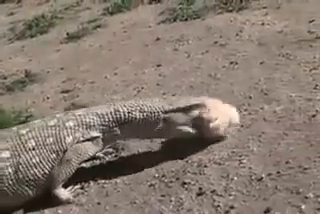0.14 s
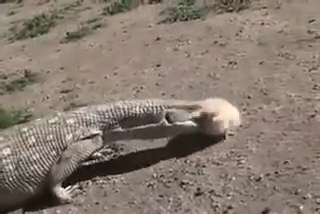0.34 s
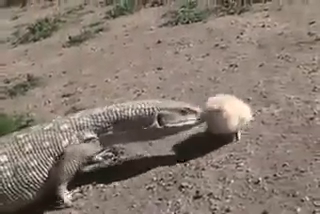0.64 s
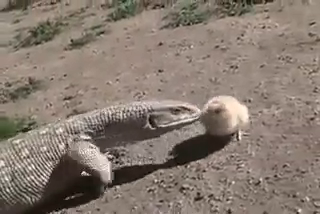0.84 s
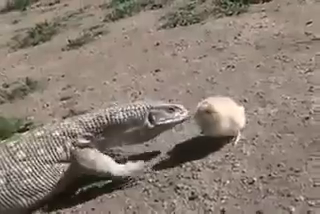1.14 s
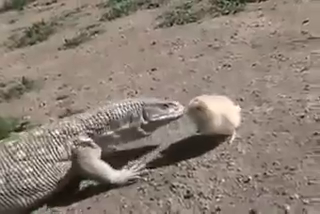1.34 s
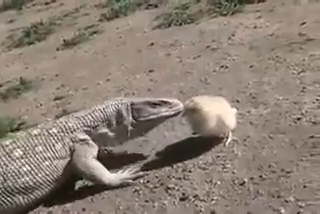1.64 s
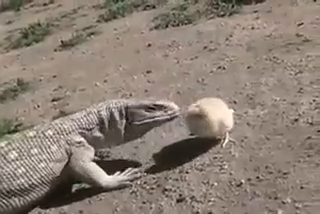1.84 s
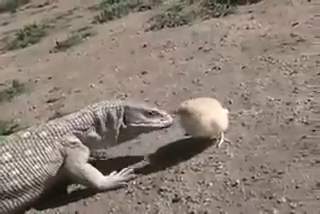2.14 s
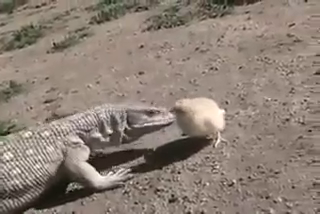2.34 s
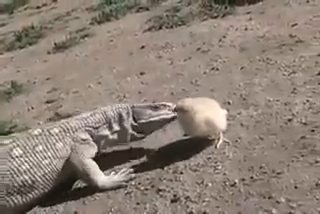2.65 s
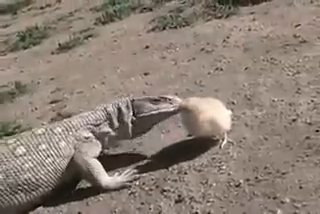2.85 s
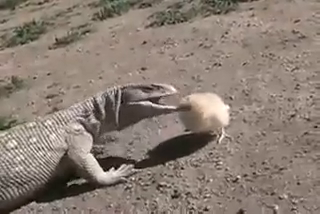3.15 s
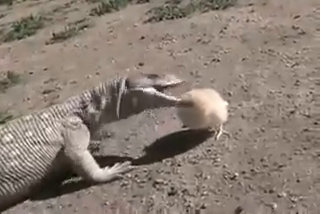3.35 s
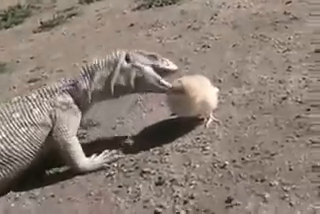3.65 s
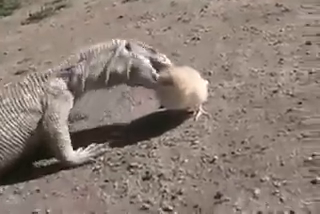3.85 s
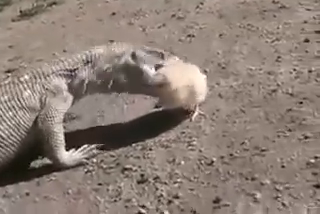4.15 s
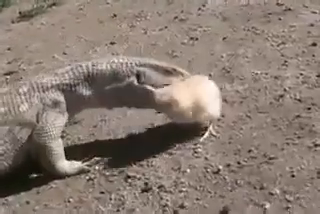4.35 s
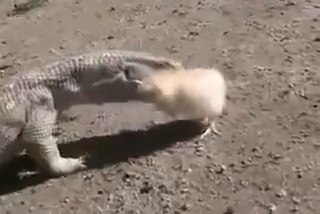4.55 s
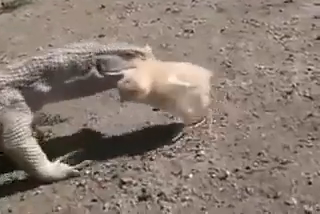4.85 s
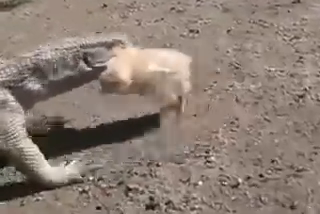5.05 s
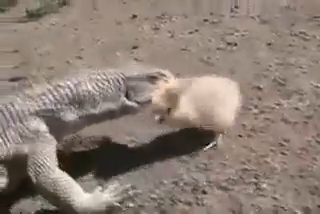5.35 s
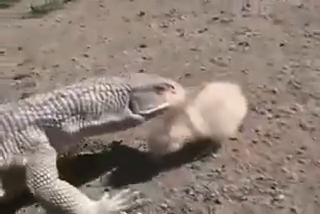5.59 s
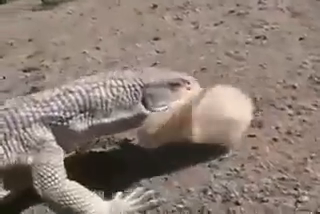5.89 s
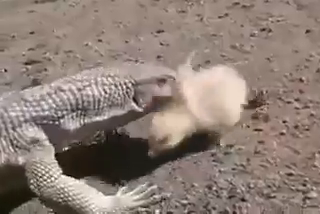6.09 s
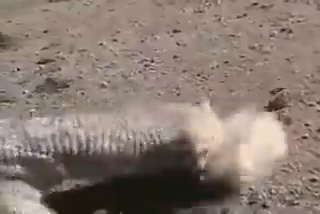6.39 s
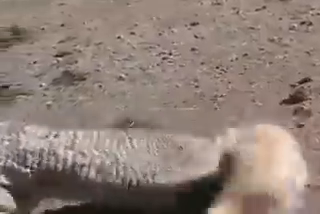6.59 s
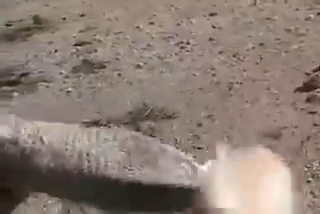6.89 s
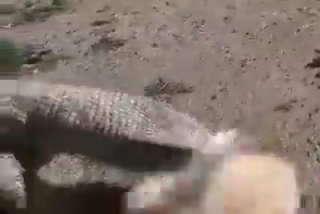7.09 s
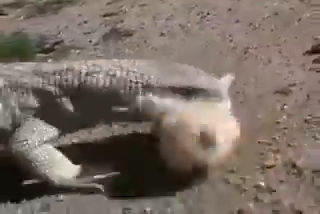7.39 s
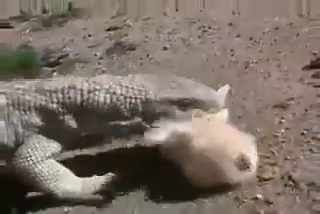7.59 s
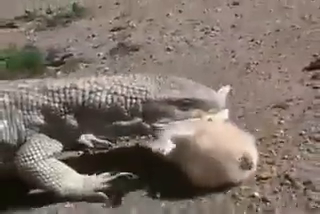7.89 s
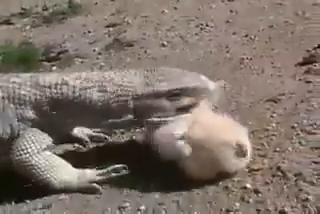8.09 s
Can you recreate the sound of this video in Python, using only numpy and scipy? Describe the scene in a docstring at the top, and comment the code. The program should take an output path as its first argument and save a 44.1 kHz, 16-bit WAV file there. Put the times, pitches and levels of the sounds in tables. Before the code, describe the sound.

A nearby chick cheeps softly now and then on open gravel, with small gritty crunches from a moving lizard. Wild birds chirp in the distance over a low outdoor rumble and faint motor hum. Then the chick suddenly cries out six times, loud and piercing, about two peeps a second, its voice breaking hoarsely. Brief soft wing flaps and a faint, low two-part bird call sound among the first cries.

```python
"""Low outdoor noise and a distant motor hum throughout; wild birds whistle and twitter far off.
A chick on open gravel gives seven soft cheeps while a monitor lizard shifts on the grit.
Seized at about 5.2 s, the chick gives six loud distress peeps, arched whistles of the syrinx.
From the second on, each cracks and drops into a rasping tail. After the first and the second,
wings flap against the ground; a low two-part call sounds far off."""
import sys
import numpy as np
from scipy import signal
from scipy.fft import rfft, irfft, next_fast_len
from scipy.io import wavfile
from scipy.ndimage import uniform_filter1d, map_coordinates

SR = 44100
rng = np.random.default_rng(int(sys.argv[2]) if len(sys.argv) > 2 else 0)


def pcm_store(signal):
    """Save signal as 16-bit PCM."""
    levels = np.round(np.clip(np.atleast_2d(signal), -1, 1) * 32767)
    wavfile.write(sys.argv[1], SR, levels.astype(np.int16).T)


N = 362943
TIME_S = np.arange(N) / SR

# outdoor noise spectrum (frequency [Hz], relative density [dB])
AIR_COLOUR = [(15, -55), (25, -22), (56, 1.5), (166, 0.5), (372, -8), (467, -10), (717, -12.5), (1020, -11),
              (1780, -20), (2290, -20), (2530, -22.5), (4300, -26.5), (4880, -26.5), (8290, -33.5),
              (10400, -39), (13500, -68.5), (22000, -120)]
# left-right likeness of that noise (frequency [Hz], correlation [0-1])
AIR_COHERENCE = [(40, .2), (100, 0.48), (400, 0.13), (1200, 0), (2500, 0.14), (5000, 0.01), (10000, 0)]
# its swell above the rumble (time [s], gain [dB])
AIR_SWELL = [(0, 2), (1.0, 0.5), (2.2, -0.5), (3.6, 1.5), (4.4, 2.5), (5.3, 4), (6.302, 0), (7.4, 2),
             (8.23, 2)]
# motor lines (frequency [Hz], level [dB], factor on the swell [ratio])
MOTOR_LINES = [(68, -58.5, .2), (136, -59, .5), (204, -63, 1.1), (990, -72, .7), (1163, -72, .7),
               (1346, -75, .7)]
# motor swell (time [s], gain [dB])
MOTOR_SWELL = [(0, -1.5), (1.15, 4), (1.3, 8.5), (1.55, 5.5), (1.75, 2.5), (3.7, 2), (5.2, 3), (6.6, -7),
               (7.5, 1.5), (8.23, 2)]
# dry gravel under the lizard (centre [s], half width [s], level [dB])
RUSTLES = [(.65, 0.75, -85), (2.15, 0.26, -68.5), (3.8, 0.24, -80)]
# rustle spectrum (frequency [Hz], gain [dB])
RUSTLE_COLOUR = [(1500, -27), (4000, -62), (6000, 19), (8000, 21), (10000, -26)]
# songbird phrase (delay [s], length [s], first [Hz], middle [Hz], last [Hz], level re phrase [dB])
PHRASE_NOTES = [(0, 0.061, 1765, 1865, 1980, 1), (0.11, 0.095, 2860, 3027, 2860, 0),
                (0.176, 0.13, 2620, 2450, 2280, 0.5)]
# its repeats (time [s], level [dB])
PHRASES = [(0.019, -59.5), (0.416, -57.5), (0.832, -60.5), (1.269, -62)]
# slightly sagging whistles (time [s], length [s], pitch [Hz], level [dB])
WHISTLES = [(.185, 0.12, 4910, -62), (.38, 0.22, 4870, -60), (2.603, 0.61, 4310, -65.5),
            (2.92, 0.076, 2870, -63.5), (3.17, .057, 3770, -58), (3.285, .053, 3670, -57),
            (3.478, .3, 4740, -68), (3.558, 0.066, 2890, -60), (3.869, 0.23, 4510, -57.5),
            (4.654, 0.051, 2950, -57.5)]
# runs of chips (time [s], run length [s], period [s], chip length [s], pitch [Hz], level [dB])
TRILLS = [(.668, .3, .12, 0.094, 5340, -64.5), (3.13, .22, 0.055, 0.0292, 4950, -57),
          (3.367, .1, .071, 0.044, 4710, -54)]
# chip pitch re run pitch (first [ratio], middle [ratio], last [ratio])
CHIP_FALL = (1.045, 1, 0.91)
# another bird's upslur (length [s], first [Hz], middle [Hz], last [Hz])
UPSLUR_NOTE = (.13, 2240, 2320, 2430)
# its repeats (time [s], level [dB])
UPSLURS = [(1.98, -68), (2.407, -62), (2.8, -60), (2.982, -58), (3.628, -58.5), (4.715, -58)]
# low two-part call (time [s], length [s], first [Hz], middle [Hz], last [Hz], level [dB])
HOOTS = [(5.87, .26, 817, 810.5, 896, -49.5), (6.17, .2, 816, 813, 820, -52.5)]
# soft cheeps (time [s], length [s], first [Hz], top [Hz], level [dB], octave re tone [dB])
CHEEPS = [(0.212, 0.065, 2060, 3440, -50.5, -20), (0.512, 0.089, 2390, 3850, -38, -35),
          (0.915, 0.055, 2940, 3620, -45, -19), (2.223, 0.048, 2990, 3580, -45, -16),
          (4.273, 0.061, 2370, 3810, -41.5, -8.5), (4.601, 0.071, 2250, 3786, -39, -12.5),
          (4.962, 0.043, 3150, 3750, -36.5, -20)]
# chick's throat response (frequency [Hz], gain [dB])
THROAT_COLOUR = [(900, -5), (1230, 5), (1480, -4.5), (2500, 2), (4000, 1), (5200, 2), (6500, 3.5),
                 (8000, -1), (9200, 5.5), (10400, -2.5)]
# ground and yard scatter (frequency [Hz], gain [dB])
SCATTER_COLOUR = [(1000, -17), (2500, -4), (4000, 2), (5200, 1), (7000, -7), (10000, -4)]
# flock bouts (centre [s], half width [s], level [dB])
TWITTER_BOUTS = [(.6, 0.39, -63), (3.55, 0.33, -58.5)]
# grit under claws and feet (time [s], level [dB])
CRUNCHES = [(2.468, -52), (4.135, -55), (4.494, -49.5), (5.083, -51), (5.381, -41)]
# crunch spectrum (frequency [Hz], gain [dB])
CRUNCH_COLOUR = [(150, -16), (500, 5), (1500, -7), (3500, -6), (6000, -13.5), (10000, -15)]
# lizard shifting its weight in the dirt (time [s], level [dB])
SHUFFLES = [(3.99, -48.5), (4.04, -47), (4.113, -51.5), (4.168, -50.5), (4.224, -50)]
# shuffle spectrum (frequency [Hz], gain [dB])
SHUFFLE_COLOUR = [(150, -28), (280, -4), (380, 4), (680, -1), (900, -13), (2000, -48), (10000, -51)]
# distress peeps (time [s], rise [s], fall [s], tail [s], first [Hz], top [Hz], before crack [Hz],
# after crack [Hz], rise bend [exponent], fall bend [exponent], top level [dB], swell to top [dB],
# fade from top [dB], brightness [dB], rasp [0-1])
PEEPS = [(5.241, .16, 0.28, 0.024, 3540, 5374, 3620, 3600, 3.08, 2.09, -10.5, 32, 29.5, -0.5, 0.05),
         (5.914, 0.11, .077, .1, 3650, 5239, 4430, 3487, 3.6, 3.5, -9, 16.5, 4, 9, 0.03),
         (6.423, 0.086, .104, 0.093, 3873, 5183, 4820, 3426, 2.3, 4.9, -9.5, 6.5, 2, 1, 0.04),
         (6.932, 0.12, 0.073, 0.092, 4560, 5396, 4650, 3504, 3.8, 2.4, -11, 4, 2, -5.5, 0.06),
         (7.465, .14, 0.053, 0.074, 4444, 5310, 4554, 3690, 3.2, 2, -17, 12, -8, -7, 0.1),
         (7.985, 0.13, 0.043, .108, 3825, 5080, 4590, 3385, 3.8, 2.4, -11.5, 11, -2.5, -7.5, 0.08)]
# octave strength by pitch (pitch [Hz], level re tone [dB])
OCTAVE_BY_PITCH = [(2300, -8.5), (2950, 1.5), (3400, -9), (4000, -22), (4700, -21), (5100, -15.5),
                   (5250, -30), (5400, -48.5)]
# spells of period doubling
# (time [s], length [s], 3/2 line [dB], 1/2 line re 3/2 line [dB], pitch sag [Hz], added rasp [0-1])
DOUBLINGS = [(5.288, 0.036, -31, -12, 4.5, 0), (5.461, .078, -27.5, -22.5, 259.5, 0.04),
             (5.932, .022, -34.5, -8, 4, 0), (6.15, 0.045, -22, -18.5, 2.5, 0.02),
             (6.437, .045, -40, -17.5, 1.5, .08), (6.546, .048, -31, -21, 130, 0.04),
             (6.633, .062, -19, -17, -1.5, 0.04), (6.956, .066, -18, -25.5, 59, .03),
             (7.17, 0.039, -22, -14.5, 3, 0.07), (7.483, 0.12, -25, -18, 72, 0.11),
             (7.667, 0.066, -25.5, -20, -3, .12), (8, 0.13, -40.5, -7, 1, 0),
             (8.196, 0.031, -20.5, -20.5, -1, 0.17)]
# second side of the syrinx, a little sharp
# (time [s], length [s], first beat [Hz], last beat [Hz], strength re main side [ratio])
SYRINX_BEATS = [(5.526, 0.054, 297.4, 527, 0.4), (6.089, 0.042, 330, 610, 0.92),
                (6.928, 0.033, 545, 243, 0.96), (7.03, 0.043, 187.8, 232, 0.61),
                (7.065, 0.048, 243.7, 150, .4), (7.589, 0.038, 267, 137.7, 0.79),
                (7.982, .038, 647, 260, 0.52)]
# fundamental dips, overtones carry on (centre [s], half width [s], depth [dB])
FUNDAMENTAL_DIPS = [(5.291, 0.0068, 12), (5.306, 0.046, 8), (5.55, 0.014, 5.5), (5.968, .009, 6),
                    (6.147, 0.02, 13), (6.535, .007, 16), (6.972, 0.014, 14), (7.065, .007, 12),
                    (7.56, 0.012, 5.5), (7.596, 0.0071, 7.5), (7.665, 0.0022, 13.5), (8.027, 0.025, 6.5),
                    (8.098, 0.01, 2), (8.15, .005, 5)]
# air tearing through the syrinx (frequency [Hz], gain [dB])
TURBULENCE_COLOUR = [(1200, -41.5), (2600, -11), (4000, 6), (7000, 6), (10000, -4.5)]
# wing flap bursts (time [s], length [s], period [s], level [dB])
FLAP_BURSTS = [(5.736, .34, .0403, -46.5), (6.213, .34, .052, -47.5)]
# flap spectrum (frequency [Hz], gain [dB])
FLAP_COLOUR = [(150, -20), (400, -8), (650, -2), (950, 0), (1300, -11), (3000, -23), (10000, -40)]


def gain_of(db):
    """dB to amplitude."""
    return 10 ** (np.asarray(db) / 20)


def unit_rms(x):
    """Scale to rms 1."""
    return x / np.sqrt(np.mean(x ** 2) + 1e-20)


def curve_at(points, hz):
    """Interpolate on a log-frequency axis."""
    points_hz, values = np.transpose(points)
    return np.interp(np.log(hz + 1), np.log(points_hz + 1), values)


def add(mix, start_s, sound):
    """Mix in place at start_s."""
    part = mix[max(round(start_s * SR), 0):][:len(sound)]
    part += sound[:len(part)]


def coloured(x, colour):
    """Filter by a spectrum in dB."""
    n = next_fast_len(x.shape[-1], True)
    response = gain_of(curve_at(colour, np.fft.rfftfreq(n, 1 / SR)))
    return irfft(rfft(x, n) * response, n)[..., :x.shape[-1]]


def wobble(size, cutoff_hz):
    """Low-passed noise, rms 1."""
    n = next_fast_len(size, True)
    rolloff = 1 + (np.fft.rfftfreq(n, 1 / SR) / cutoff_hz) ** 4
    return unit_rms(irfft(rfft(rng.standard_normal(n)) / rolloff, n)[:size])


def bumps(t, rows):
    return sum(height * np.exp(-((t - s) / width_s) ** 2) for s, width_s, height in rows)


def scatter(x, t60_s):
    """Dense reflections off ground and bushes, different per ear."""
    t = np.arange(SR // 2) / SR
    tail = rng.standard_normal((2, len(t))) * gain_of(-60 * t / t60_s) * (t > .002)
    return signal.fftconvolve(x[None], tail / np.linalg.norm(tail[0]), axes=1)[:, :N]


def air(level_db=-48.5, patch_db=1.08):
    """Low outdoor noise with drifting patches, partly alike in both ears."""
    frames, hz = N // 512 + 5, np.fft.rfftfreq(2048, 1 / SR)
    a, b, c, d, patches = rng.standard_normal((5, frames, len(hz)))
    patches = unit_rms(uniform_filter1d(uniform_filter1d(patches, size=9, axis=0), size=24, axis=1))
    coherence = curve_at(AIR_COHERENCE, hz)
    left = a + 1j * b
    right = coherence * left + np.sqrt(1 - coherence ** 2) * (c + 1j * d)
    swell_db = np.interp(np.arange(frames) * 512 / SR, *np.transpose(AIR_SWELL))[:, None]
    above_rumble = np.interp(hz, [150, 400], [0, 1])
    shape_db = curve_at(AIR_COLOUR, hz) + patch_db * patches + swell_db * above_rumble
    spectra = np.array([left, right]) * gain_of(shape_db)
    _, noise = signal.istft(spectra.transpose(0, 2, 1), nperseg=2048, noverlap=1536)
    return gain_of(level_db) * unit_rms(noise[:, :N])


def motor(waver_hz=2, flutter=.37):
    """Distant hum and faint whines, wavering in pitch and level."""
    out = np.zeros((2, N))
    swell_db = np.interp(TIME_S, *np.transpose(MOTOR_SWELL))
    for hz, db, share in MOTOR_LINES:
        phase = 2 * np.pi * np.cumsum(hz + waver_hz * wobble(N, 7.5)) / SR
        envelope = gain_of(db + share * swell_db) * (1 + flutter * wobble(N, 9))
        out += envelope * np.sqrt(2) * np.sin(phase + rng.normal(0, .72, (2, 1)))
    return out


def gravel_rustle(grain_db=4, clump_db=3):
    """Fine gravel shifting in clumps of tiny grains."""
    grains = rng.standard_normal(N) * gain_of(grain_db * wobble(N, 500) + clump_db * wobble(N, 12))
    push = bumps(TIME_S, [(s, width_s, gain_of(db)) for s, width_s, db in RUSTLES])
    return scatter(push * unit_rms(coloured(grains, RUSTLE_COLOUR)), t60_s=.04)


def bird_notes(sag=.012):
    """All far notes (time [s], length [s], first [Hz], middle [Hz], last [Hz], level [dB])."""
    notes = [(s + delay_s, *shape, db + note_db)
             for s, db in PHRASES for delay_s, *shape, note_db in PHRASE_NOTES]
    notes += [(s, *UPSLUR_NOTE, db) for s, db in UPSLURS]
    notes += [(s, length_s, hz * (1 + sag), hz, hz * (1 - sag), db) for s, length_s, hz, db in WHISTLES]
    for s, run_s, period_s, length_s, hz, db in TRILLS:
        chip_hz = hz * np.array(CHIP_FALL)
        notes += [(s + delay_s, length_s, *chip_hz, db) for delay_s in np.arange(0, run_s, period_s)]
    return notes + list(HOOTS)


def far_birds(direct_db=-3, wet_db=-3):
    """Gliding whistles, blurred by distance."""
    song = np.zeros(N)
    for s, length_s, first_hz, middle_hz, last_hz, db in bird_notes():
        u = np.linspace(0, 1, int(length_s * SR))
        waver = np.interp(middle_hz, [800, 2000, 3000, 4500], [.008, .02, .016, .007])
        glide_hz = np.polyval(np.polyfit([0, .5, 1], [first_hz, middle_hz, last_hz], 2), u)
        hz = glide_hz * (1 + waver * wobble(len(u), 180))
        envelope = gain_of(db + 2.5 * wobble(len(u), 40)) * signal.windows.tukey(len(u), .4)
        add(song, s, np.sqrt(2) * envelope * np.sin(2 * np.pi * np.cumsum(hz) / SR))
    return gain_of(direct_db) * song + gain_of(wet_db) * scatter(song, t60_s=.44)


def cheep(length_s, first_hz, top_hz, db, octave_db, crest=.68, drop=.17):
    """Soft note: slides up, swells at the top, sags."""
    u = np.linspace(0, 1, int(length_s * SR))
    rising_hz = first_hz + (top_hz - first_hz) * np.sin(np.pi / 2 * np.minimum(u / crest, 1)) ** 1.9
    falling_hz = top_hz * (1 - drop * ((u - crest) / (1 - crest)) ** 2)
    hz = np.where(u < crest, rising_hz, falling_hz) * (1 + .01 * wobble(len(u), 300))
    phase = 2 * np.pi * np.cumsum(hz) / SR
    envelope = np.interp(u, [0, .15, .45, .72, 1], [0, .33, .58, 1.3, 0])
    return gain_of(db) * envelope * (np.sin(phase) + gain_of(octave_db) * np.sin(2 * phase))


def direct_path(x, lag_ms=.032, right_db=1.0):
    """Two close microphone ports: right leads and is louder; both cues drift as the chick moves."""
    lag_samples = (lag_ms + .007 * wobble(N, 14)) * SR / 1000
    side_db = right_db + 1.2 * wobble(N, 25)
    left = map_coordinates(x, [np.arange(N) - lag_samples], order=5, mode="nearest")
    return np.array([left * gain_of(-side_db / 2), x * gain_of(side_db / 2)])


def chick(direct_db=-1.41, ground_db=-21, yard_db=-41):
    """Near voice through the throat, with short gravel scatter and a faint yard tail."""
    voice = np.zeros(N)
    for row in PEEPS:
        add(voice, row[0], peep(row))
    for s, *shape in CHEEPS:
        add(voice, s, cheep(*shape))
    voice = coloured(voice, THROAT_COLOUR)
    thrown = coloured(voice, SCATTER_COLOUR)
    return (gain_of(direct_db) * direct_path(voice)
            + gain_of(ground_db) * scatter(thrown, t60_s=.12)
            + gain_of(yard_db) * scatter(thrown, t60_s=.58))


def flock(count=1200, low_hz=2600, high_hz=5200, slide=.15, chirp_s=.013, floor_db=-83.5):
    """Tiny chirps, too distant to tell apart, swelling in bouts."""
    chirps, u = np.zeros(N), np.linspace(0, 1, int(chirp_s * SR))
    for when, height, slope in rng.random((count, 3)):
        hz = (low_hz + (high_hz - low_hz) * height) * (1 + slide * (2 * slope - 1) * u)
        add(chirps, when * N / SR, np.sin(np.pi * u) * np.sin(2 * np.pi * np.cumsum(hz) / SR))
    bouts = bumps(TIME_S, [(s, width_s, gain_of(db)) for s, width_s, db in TWITTER_BOUTS])
    return unit_rms(scatter(chirps, t60_s=.15)) * (gain_of(floor_db) + bouts)


def scuffs(rows, colour, decay_s, grain_db, wet_db):
    """Ground contacts: short puffs of grainy noise."""
    out, t = np.zeros(N), np.arange(SR // 12) / SR
    envelope = t / decay_s * np.exp(1 - t / decay_s)
    for s, db in rows:
        grains = rng.standard_normal(len(t)) * gain_of(grain_db * wobble(len(t), 600))
        add(out, s, gain_of(db) * unit_rms(coloured(grains, colour)) * envelope)
    return out + gain_of(wet_db) * scatter(out, t60_s=.04)


def peep_contour(start_s, rise_s, fall_s, tail_s, first_hz, top_hz, crack_hz, tail_hz,
                 rise_bend, fall_bend, top_db, swell_db, fade_db, bright_db, rasp):
    """Pitch arches under growing strain; given a tail over 40 ms, the voice cracks and slides down."""
    crack_s, surge_s, surge_db = .0078, .0038, 3
    tail_db, collapse_db, end_hz = -15.5, 40, 2220
    onset_rasp, strain_rasp, tail_rasp = .15, .13, .076
    octave_hold = .39  # share of swell and fade that the overtones resist
    cracks = tail_s > .04
    t = np.arange(0, rise_s + fall_s + cracks * tail_s, 1 / SR)
    after_s = t - rise_s - fall_s
    early, late = np.clip(1 - t / rise_s, 0, 1), np.clip((t - rise_s) / fall_s, 0, 1)
    tail = np.clip(after_s / max(tail_s, crack_s), 0, 1)
    cracked = cracks * (1 - np.exp(-(np.maximum(after_s, 0) / crack_s) ** 1.5))
    intact = 1 - cracked
    arch_hz = top_hz + (first_hz - top_hz) * early ** rise_bend + (crack_hz - top_hz) * late ** fall_bend
    hz = intact * arch_hz + cracked * (tail_hz + (end_hz - tail_hz) * tail)
    slack_db = swell_db * early ** 1.7 + fade_db * late ** 2.06
    level_db = intact * (top_db - slack_db) + cracked * (tail_db - collapse_db * tail ** 3.81)
    level_db += cracks * bumps(after_s, [(0, surge_s, surge_db)])
    arch_rasp = rasp + onset_rasp * early ** 2 + cracks * strain_rasp * late ** 4
    rasp = intact * arch_rasp + cracked * tail_rasp
    octave_db = curve_at(OCTAVE_BY_PITCH, hz) + intact * (bright_db + octave_hold * slack_db)
    return start_s + t, uniform_filter1d(hz, size=220, mode="nearest"), level_db, octave_db, rasp


def period_doubling(t, edge=.4):
    """Strong and weak cycles alternate: 3/2 and 1/2 line gains, pitch sag, added rasp."""
    main, lowest, sag_hz, added_rasp = np.zeros((4, len(t)))
    for s, length_s, db, lowest_db, depth_hz, rasp in DOUBLINGS:
        spell = np.clip((1 - abs(2 * (t - s) / length_s - 1)) / edge, 0, 1) ** 2
        main += gain_of(db) * spell
        lowest += gain_of(db + lowest_db) * spell
        sag_hz += bumps(t, [(s + length_s / 2, length_s / 2, depth_hz)])
        added_rasp += rasp * spell
    return main, lowest, sag_hz, added_rasp


def second_membrane(t, flutter=.36):
    """The other side of the syrinx beats against the main tone; complex gain."""
    other = np.zeros(len(t), complex)
    for s, length_s, first_hz, last_hz, strength in SYRINX_BEATS:
        u = np.clip((t - s) / length_s, 0, 1)
        beat_hz = (first_hz + (last_hz - first_hz) * u) * (1 + flutter * wobble(len(t), 110))
        other += strength * np.sqrt(abs(np.sin(np.pi * u))) * np.exp(2j * np.pi * np.cumsum(beat_hz) / SR)
    return (1 + other) / np.sqrt(1 + abs(other) ** 2)


def overtone_flicker(db):
    """Complex overtone gain; weaker is less steady."""
    depth = np.interp(db, [-20, 0], [.35, .1])
    return gain_of(db) * (1 + depth * (wobble(len(db), 150) + 1j * wobble(len(db), 220)))


def peep(row, drift=.0015, jitter=.0035, crack_hz_per_s=300000, turbulence_db=-13,
         attack_s=.011, release_s=.006):
    """Syrinx whistle with overtones, half-pitch lines and turbulence; rough where it cracks."""
    t, hz, level_db, octave_db, rasp = peep_contour(*row)
    n = len(t)
    main, lowest, sag_hz, added_rasp = period_doubling(t)
    hz = hz - sag_hz
    chaos = np.minimum(np.gradient(hz, t), 0) / crack_hz_per_s  # from sudden pitch drops
    rasp = np.hypot(rasp + added_rasp, chaos)
    hz = hz * (1 + drift * wobble(n, 30) + jitter * wobble(n, 120) + .09 * rasp * wobble(n, 650))
    phase = 2 * np.pi * np.cumsum(hz) / SR
    slip_rad = (.15 + 2 * rasp) * wobble(n, 340)  # the alternation loses step when hoarse
    tone = np.exp(1j * phase) * second_membrane(t) * gain_of(-bumps(t, FUNDAMENTAL_DIPS))
    for multiple, db in [(2, octave_db), (3, octave_db - 11)]:
        tone += overtone_flicker(db) * np.exp(1j * multiple * phase)
    half_lines = [(.5, lowest), (1.5, main), (2.5, main * gain_of(-14)), (3.5, main * gain_of(-23))]
    for multiple, gain in half_lines:
        flicker = 1 + .38 * wobble(n, 150)
        tone += gain / gain_of(level_db) * flicker * np.exp(1j * (multiple * phase + slip_rad))
    shake = 1 + .77 * rasp * wobble(n, 700)  # uneven cycles smear every line
    turbulence = gain_of(turbulence_db + 3 * wobble(n, 90)) * rasp
    turbulence *= unit_rms(coloured(rng.standard_normal(n), TURBULENCE_COLOUR))
    shimmer_db = .6 * wobble(n, 160) + .02 * wobble(n, 35)
    gate = np.minimum((t - t[0]) / attack_s, 1) ** 2 * np.minimum((t[-1] - t) / release_s, 1)
    return (np.sqrt(2) * tone.real * shake + turbulence) * gain_of(level_db + shimmer_db) * gate


def wing_flaps(edge_db=-7):
    """Wings hit the ground at an even pace, strongest mid-burst."""
    beats = [(s + delay_s, db + edge_db * (2 * delay_s / length_s - 1) ** 2)
             for s, length_s, period_s, db in FLAP_BURSTS for delay_s in np.arange(0, length_s, period_s)]
    return scuffs(beats, FLAP_COLOUR, decay_s=.007, grain_db=3, wet_db=-5)


def scene():
    """Chick and struggle in front; birds, motor and air behind."""
    flaps = wing_flaps()
    crunches = scuffs(CRUNCHES, CRUNCH_COLOUR, decay_s=.0024, grain_db=5.5, wet_db=1.5)
    shuffles = scuffs(SHUFFLES, SHUFFLE_COLOUR, decay_s=.014, grain_db=7, wet_db=-23)
    front = chick() + flaps + crunches + shuffles + gravel_rustle()
    return front + far_birds() + flock() + motor() + air()


def record(dry):
    """Soft limit on the highest peaks, then low-pass."""
    knee, headroom, cutoff_hz = .62, .2, 10640
    clean = np.clip(dry, -knee, knee)
    rounded = clean + headroom * np.tanh((dry - clean) / headroom)
    lowpass = signal.firwin(161, cutoff_hz, window=("kaiser", 8), fs=SR)
    return signal.oaconvolve(rounded, lowpass[None], "same")


dry = scene()
out = record(dry)
pcm_store(out)
```